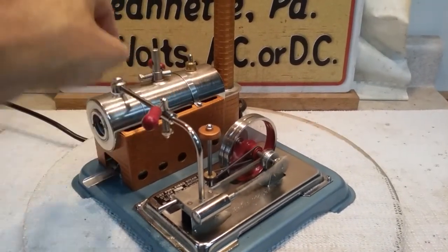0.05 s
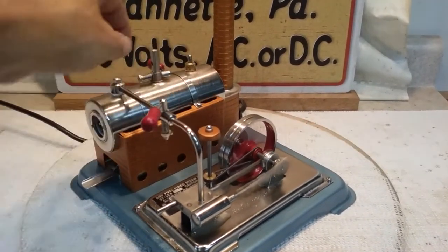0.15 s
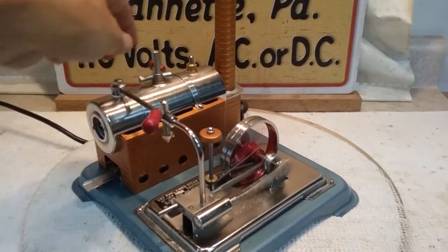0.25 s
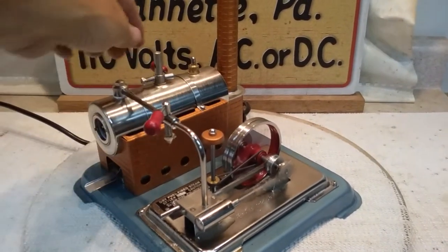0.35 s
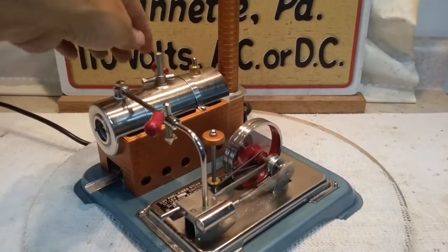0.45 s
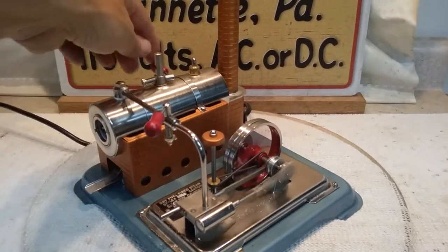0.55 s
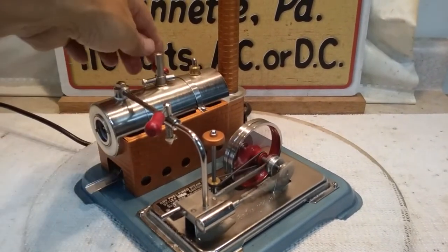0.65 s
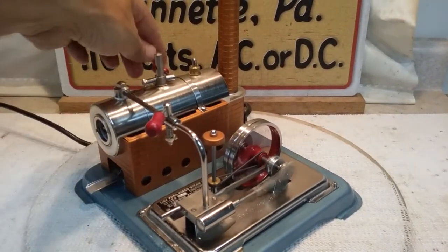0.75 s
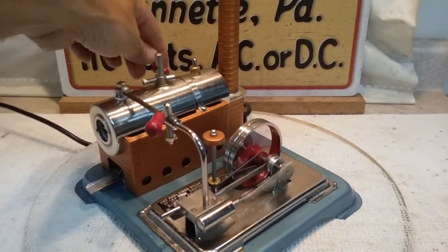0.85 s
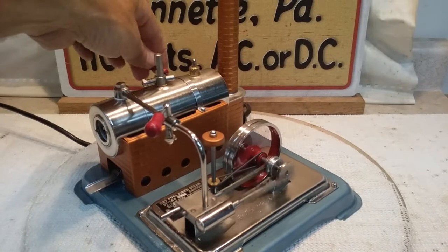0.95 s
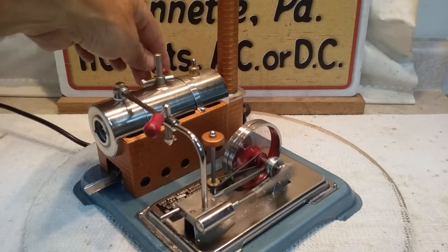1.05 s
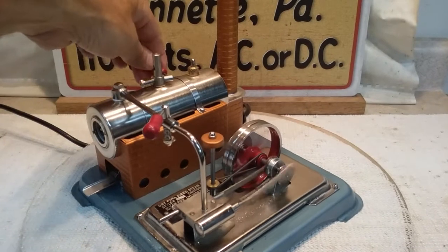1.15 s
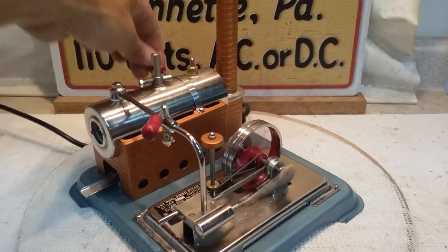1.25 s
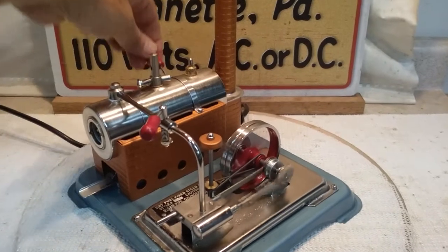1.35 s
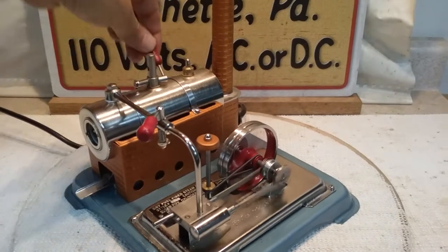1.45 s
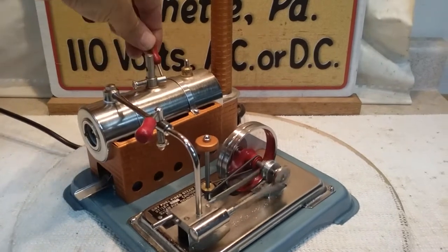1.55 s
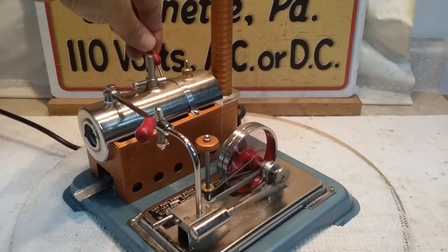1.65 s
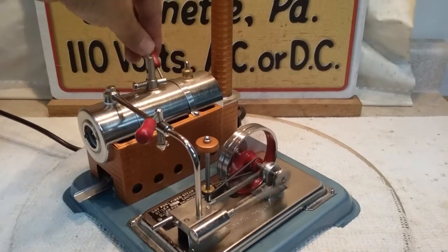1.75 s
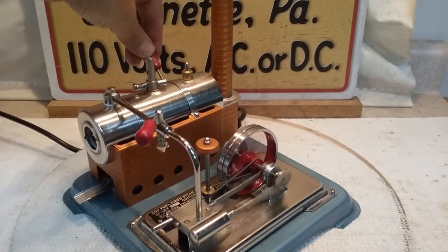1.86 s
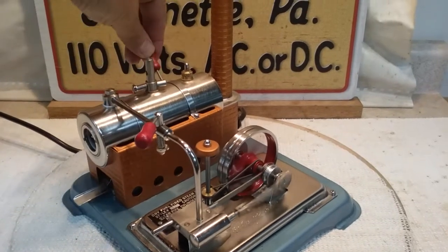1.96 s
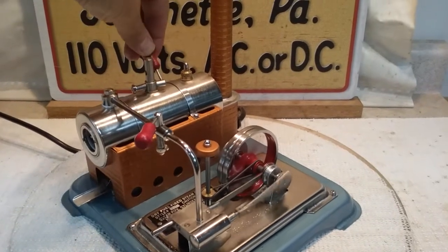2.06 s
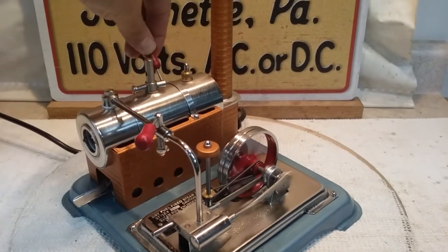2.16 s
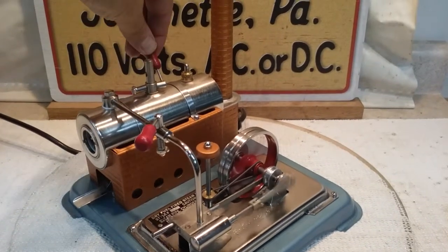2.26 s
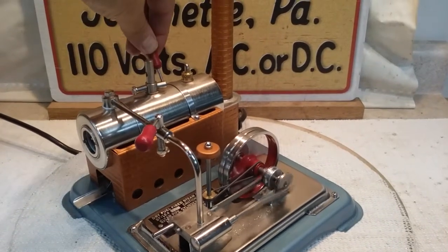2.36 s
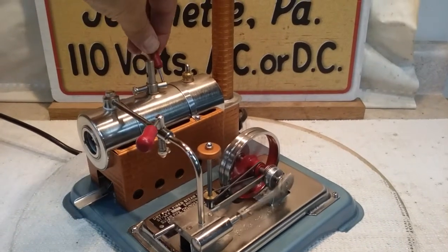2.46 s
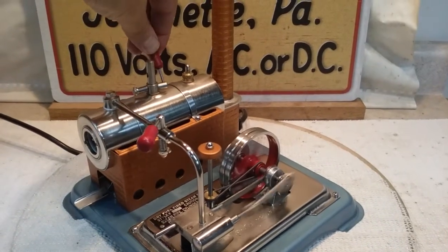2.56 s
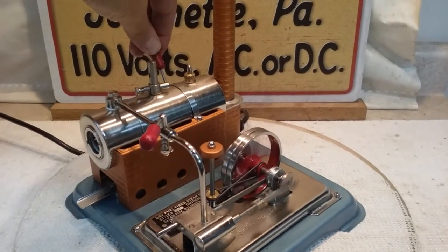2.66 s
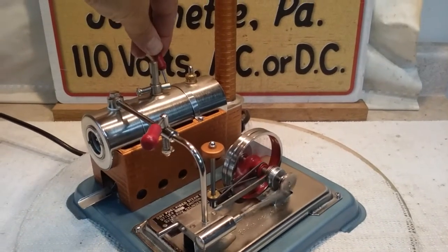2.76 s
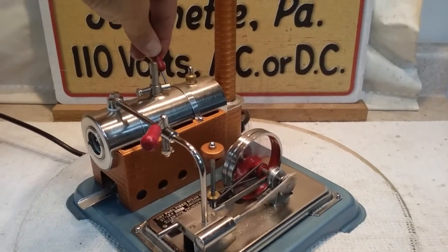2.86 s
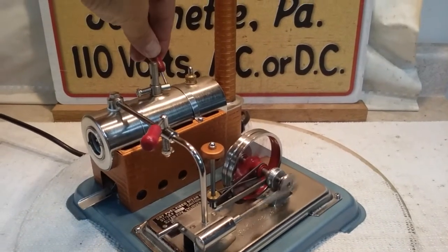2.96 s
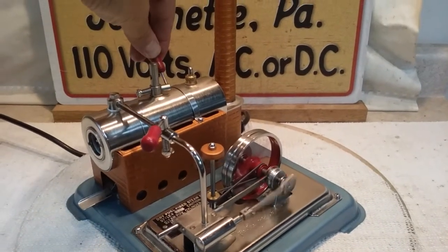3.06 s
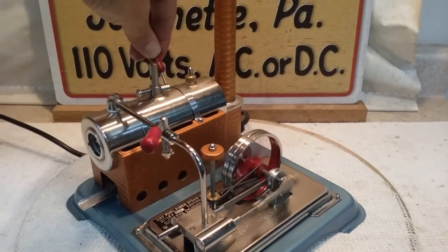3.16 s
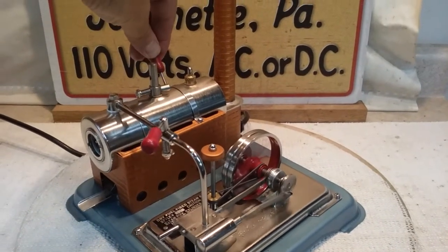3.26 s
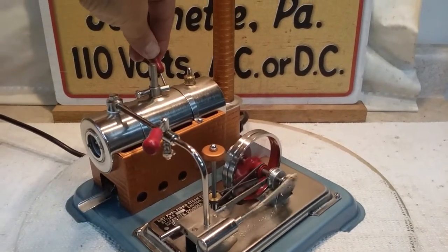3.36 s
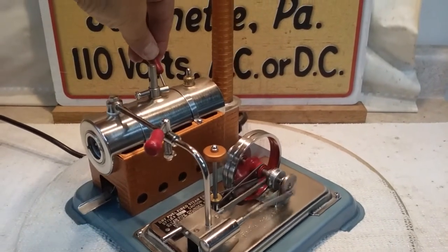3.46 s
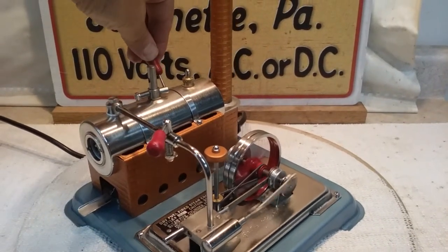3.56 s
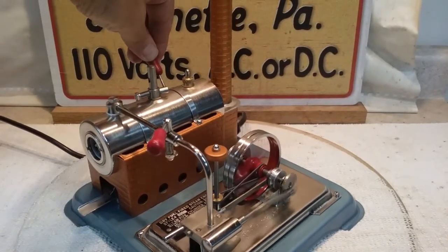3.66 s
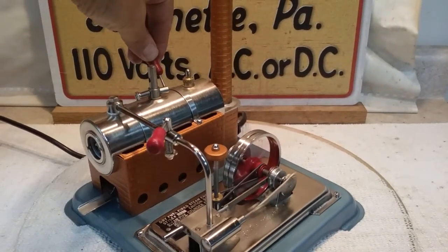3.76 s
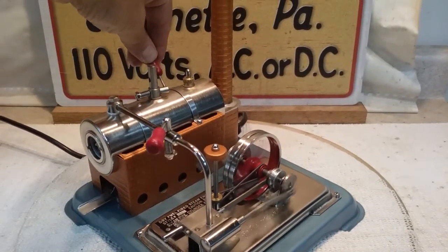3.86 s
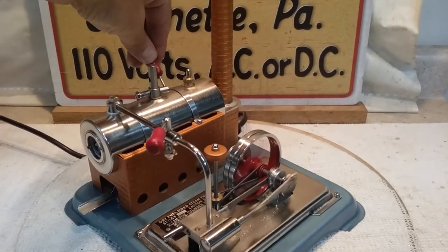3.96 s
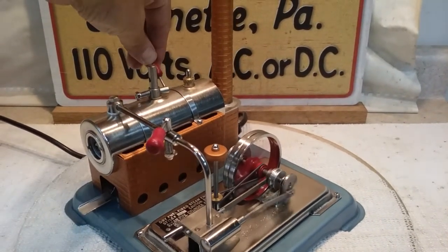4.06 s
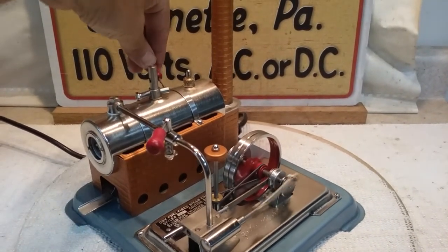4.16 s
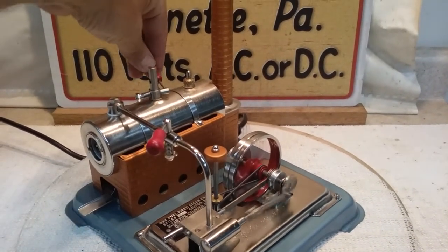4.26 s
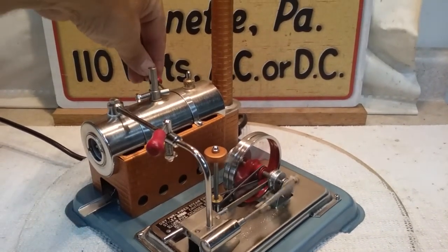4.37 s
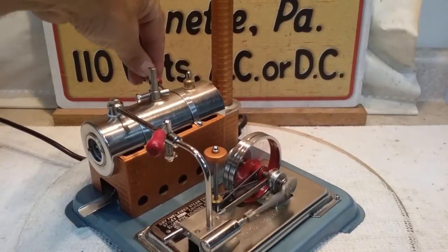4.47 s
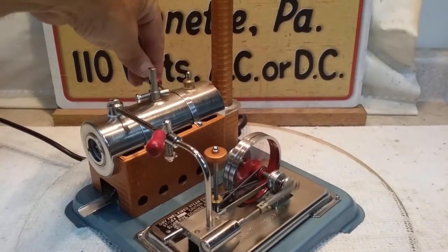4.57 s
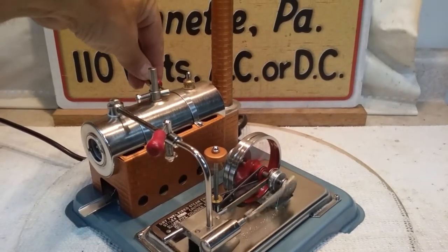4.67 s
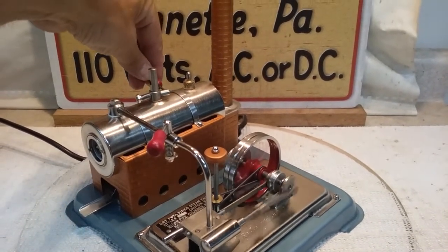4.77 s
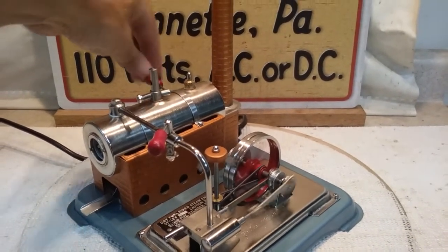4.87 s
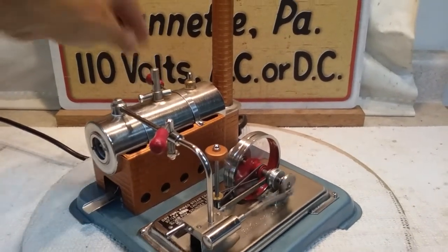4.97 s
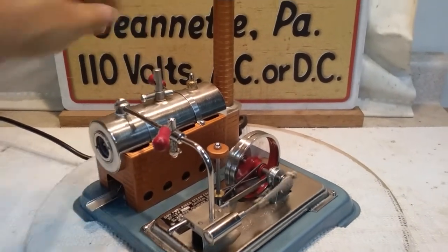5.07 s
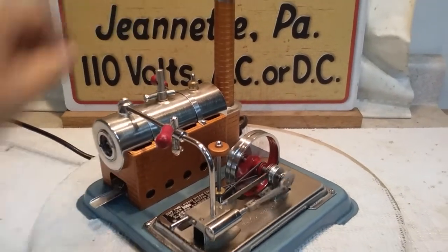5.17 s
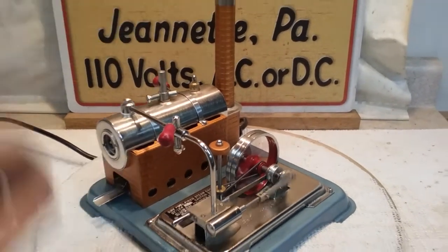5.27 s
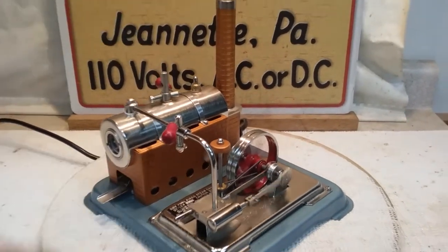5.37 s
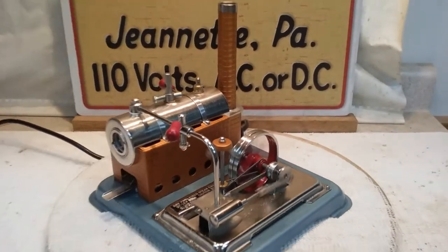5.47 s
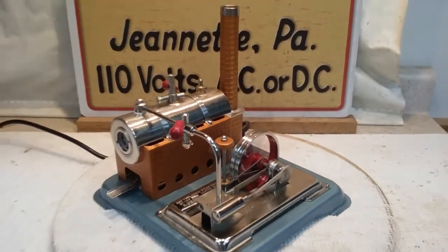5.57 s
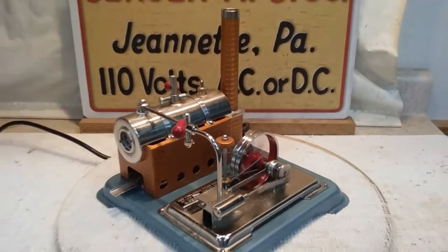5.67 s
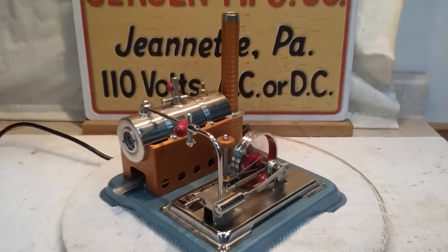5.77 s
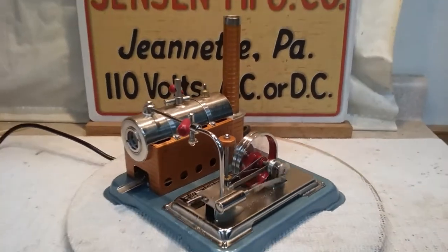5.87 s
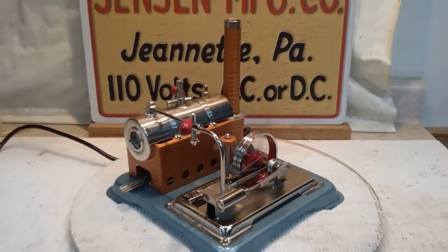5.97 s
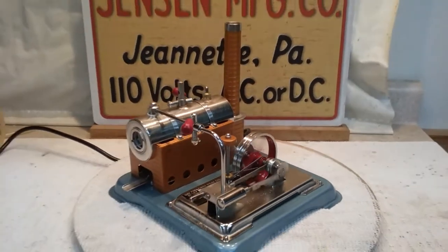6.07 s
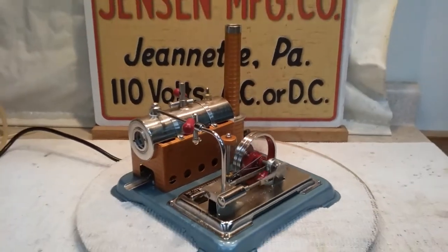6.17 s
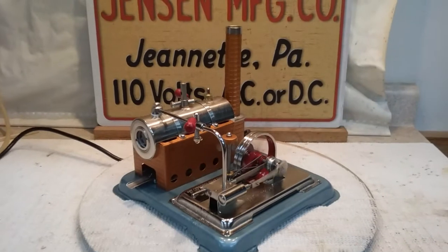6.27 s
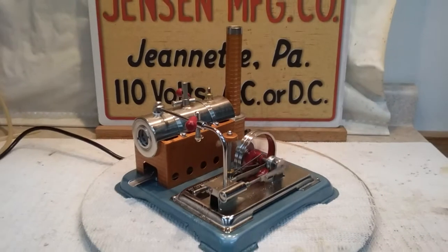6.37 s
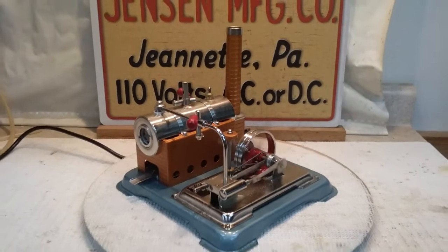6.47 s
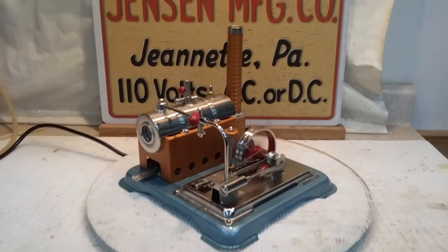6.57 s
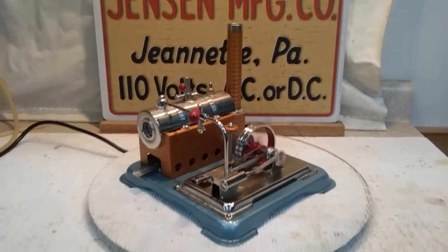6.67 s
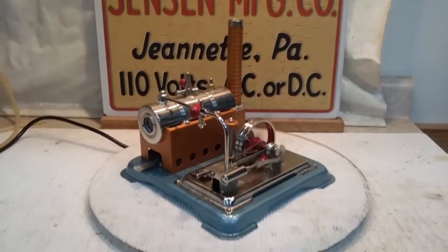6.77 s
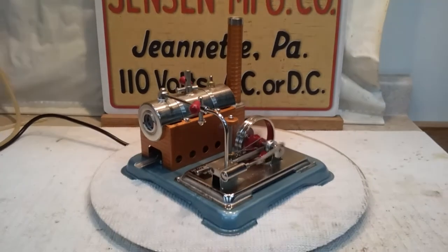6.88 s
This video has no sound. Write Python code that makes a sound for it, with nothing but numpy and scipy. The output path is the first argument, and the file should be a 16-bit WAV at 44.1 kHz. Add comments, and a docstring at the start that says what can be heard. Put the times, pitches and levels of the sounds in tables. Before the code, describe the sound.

A small steam whistle toots, then blows longer, high and hissy, over a toy steam engine slowing to a rattling crawl.

```python
"""Toy steam engine with a whistle

A toy steam engine slows to a crawl on a table in a small room. The flywheel whirrs; the crank knocks,
the exhaust plops and the slide valve ticks in time with it, while a belt pulley knocks at its own pace.
A hand opens the whistle valve twice: a short toot, then a long blow that bends up and settles, each
wrapped in the hiss of the steam jet. Once the engine is crawling, its loose rods rattle."""
import sys
import numpy as np
from scipy import signal
from scipy.fft import rfft, irfft
from scipy.io import wavfile
from scipy.ndimage import uniform_filter1d, minimum_filter1d

SR = 44100
rng = np.random.default_rng(int(sys.argv[2]) if len(sys.argv) > 2 else 0)


def dump_mix(stems):
    """Bounce the given channels to the path in sys.argv[1] as a 16-bit WAV at rate SR."""
    frames = np.atleast_2d(stems).T  # one column per channel
    limited = np.clip(frames, -1, 1)  # hard clip at full scale
    pcm = np.round(limited * 32767).astype(np.int16)
    wavfile.write(sys.argv[1], SR, pcm)


N = 305172
TIME_S = np.arange(N) / SR


def amp(db):
    """Turns decibels into a number to multiply by."""
    return 10 ** (np.asarray(db) / 20)


def evened(x):
    """Scales a signal to an average power of 1."""
    return x / np.sqrt(np.mean(x ** 2) + 1e-20)


def follow(table, at=TIME_S):
    """Reads a two-column table along straight lines between its rows."""
    return np.interp(at, *np.transpose(table))


def join_blows(blows, rest_db):
    """Makes one curve for each column after time; outside the blows the level falls to rest_db."""
    rows = []
    for blow in blows:
        first, last = blow[0], blow[-1]
        rows += [(first[0] - .01, rest_db, *first[2:]), *blow, (last[0] + .01, rest_db, *last[2:])]
    times, *columns = np.transpose(rows)
    return [np.interp(TIME_S, times, column) for column in columns]


def add(mix, start_s, sound):
    """Mixes a sound in at start_s."""
    part = mix[round(start_s * SR):][:len(sound)]
    part += sound[:len(part)]


def wander(rate_hz, n=N):
    """A smooth random wobble that changes about rate_hz times a second."""
    pole = np.exp(-2 * np.pi * rate_hz / SR)
    return evened(signal.lfilter([1], np.convolve([1, -pole], [1, -pole]), rng.standard_normal(n)))


def coloured(x, colour):
    """Turns lows and highs up or down, following rows of pitch_hz, gain_db."""
    points_hz, gain_db = np.transpose(colour)
    hz = np.fft.rfftfreq(len(x), 1 / SR)
    gain = amp(np.interp(np.log(hz + 1), np.log(points_hz + 1), gain_db))
    return irfft(rfft(x) * gain, len(x))


def noise(colour):
    """Steady noise with the given balance of lows and highs."""
    return evened(coloured(rng.standard_normal(N), colour))


def resonate(x, hz, width_hz):
    """Lets a sound ring around one pitch, which may glide; a narrow width rings longer."""
    spin = np.exp(2j * np.pi * np.cumsum(hz * np.ones(len(x))) / SR)
    pole = np.exp(-np.pi * width_hz / SR)
    return 2 * (spin * signal.lfilter([1 - pole], [1, -pole], x / spin)).real


# Tone of the quiet background: pitch_hz, gain_db
BACKGROUND_COLOUR = [(110, -38), (180, -13.5), (409, -2.5), (715, -32.5), (830, -4.5), (1320, -2.5),
                     (4280, -24.5), (5990, -13), (10300, -9), (15500, -11.5)]
# How loud the room rumbles: time_s, level_db
RUMBLE_LEVELS = [(0, -48), (1.3, -54.5), (2.1, -52.5), (2.8, -66.5), (4.2, -63.5), (4.8, -54), (6.1, -62),
                 (6.92, -59.5)]
# Tone of the rumble: pitch_hz, gain_db
RUMBLE_COLOUR = [(13, -41), (22, -18.5), (27, -16.5), (32, -23), (97, 4), (140, -2), (182, -9.5), (250, -9),
                 (320, -39), (550, -120)]
def background():
    """A faint hiss and the low rumble of the room, both gently swelling."""
    hiss = noise(BACKGROUND_COLOUR) * amp(-58 + 2 * wander(5.9))
    rumble = noise(RUMBLE_COLOUR) * amp(follow(RUMBLE_LEVELS) + 1.1 * wander(3.5))
    return hiss + rumble


# How fast the flywheel spins: time_s, turns_per_s
WHEEL_SPEED = [(0, 24.82), (.5, 16.757), (1, 13.273), (1.5, 10.884), (2.1, 8.462), (3, 6.233), (4, 4.75),
               (5, 4.258), (6.92, 4.637)]
def flywheel():
    """The wheel sets the beat: gives its speed and a running count of its turns."""
    speed = follow(WHEEL_SPEED)
    return speed, .706 + np.cumsum(speed) / SR  # starts partway through a turn


# How loud the whirr is: time_s, level_db
WHIRR_LEVELS = [(0, -31), (.4, -36), (1.2, -43.5), (2.2, -44), (3, -54), (4.2, -53), (6.92, -59)]
# Tone of the whirr: pitch_hz, gain_db
WHIRR_COLOUR = [(180, -45), (300, 4), (652, -17), (708, -11), (1300, -2), (1510, -9.5), (1910, -2.5),
                (3400, -4.5), (6790, -23), (15500, -24)]
def whirr():
    """Flywheel and bearings make a rough noise that throbs twice a turn."""
    _, turns = flywheel()
    throb_db = 1.9 * np.cos(4 * np.pi * turns) + 1.94 * wander(45)
    return noise(WHIRR_COLOUR) * amp(follow(WHIRR_LEVELS) + throb_db)


CRAWL, TROT, FULL = 4.5, 11.5, 19  # turns a second
SCATTER_DB, KNOCK_S = 1.5, .0077
def each_turn(table):
    """Lists time_s, level_db whenever the wheel passes a row's place; speed sets the level."""
    speed, turns = flywheel()
    hits = []
    for place, *levels in table:
        at = np.flatnonzero(np.diff(np.floor(turns - place)))
        level_db = np.interp(speed[at], [CRAWL, TROT, FULL], levels)
        hits += zip(at / SR, level_db + SCATTER_DB * rng.standard_normal(len(at)))
    return hits


def contacts(hits, length_s):
    """Power over time of parts touching: each touch builds, holds for a moment and lets go."""
    power = np.zeros(N)
    age = np.arange(SR // 8) / SR / length_s
    shape = (1 - np.exp(-age / .32)) * np.exp(-age ** 1.5)
    for start_s, db in hits:
        add(power, start_s, (amp(db) * shape) ** 2)
    return power


# Crank knocks within one turn: place_turns, crawl_db, trot_db, full_db
CRANK_KNOCKS = [(.01, -28, -18, -26), (.31, -35, -26, -26), (.48, -39.5, -28, -47), (.75, -31.5, -31, -19)]
def crank():
    """The power of the crank's dull knocks, four to a turn."""
    return contacts(each_turn(CRANK_KNOCKS), KNOCK_S)


# Exhaust puffs within one turn: place_turns, crawl_db, trot_db, full_db
EXHAUST_PUFFS = [(.3, -37, -54, -60), (.75, -43, -58, -64)]
def exhaust():
    """The cylinder lets out short hollow plops that ring briefly and rise a little."""
    out, t = np.zeros(N), np.arange(SR // 12) / SR
    shape = amp(-60 * t / .046) * (1 - np.exp(-t / .0025))
    for start_s, db in each_turn(EXHAUST_PUFFS):
        hz = 914 * (1 + .29 * rng.random() ** 2)
        ring = np.sin(2 * np.pi * hz * t * (1 + 1.2 * t))
        breath = evened(resonate(rng.standard_normal(len(t)), hz * 1.31, width_hz=500))
        add(out, start_s, amp(db) * shape * (ring + 1.2 * breath))
    return out


# Valve ticks within one turn: place_turns, crawl_db, trot_db, full_db
VALVE_TICKS = [(0, -46, -30, -41), (.47, -52, -37, -43)]
def slide_valve():
    """The valve gives a short, bright tick at each end of its travel."""
    out, t = np.zeros(N), np.arange(SR // 50) / SR
    shape = amp(-60 * t / .018) * (1 - np.exp(-t / .00038))
    for start_s, db in each_turn(VALVE_TICKS):
        add(out, start_s, amp(db) * shape * rng.standard_normal(len(t)))
    return coloured(out, [(2000, -4.5), (6000, 5), (9000, -3.5), (13000, 0), (16000, -2)])


# How hard the pulley knocks: time_s, level_db
PULLEY_LEVELS = [(0, -27), (.4, -13.5), (1.5, -25), (2.3, -22.5)]
def pulley(first_s=.02, first_gap_s=.034027, growth=1.022):
    """The power of the belt pulley's knocks, each gap longer than the last."""
    times = first_s + first_gap_s * (growth ** np.arange(43) - 1) / (growth - 1)
    level_db = follow(PULLEY_LEVELS, times) + SCATTER_DB * rng.standard_normal(len(times))
    return contacts(zip(times, level_db), KNOCK_S)


# Dull bumps through the table: start_s, level_db, pitch_hz
TABLE_BUMPS = [(0.29, -26, 253), (1.19, -41, 357), (2.423, -34, 235), (2.495, -36.5, 250),
               (2.701, -34, 387), (5.164, -37, 440), (5.251, -35.5, 440), (5.516, -25.5, 335),
               (5.911, -41.5, 280), (6.034, -34.5, 240), (6.358, -42, 354), (6.649, -39, 257),
               (6.803, -40.5, 500)]
def bumps(fade_s=.06):
    """Each low thud is a puff of noise ringing loosely around one pitch."""
    out, t = np.zeros(N), np.arange(SR // 5) / SR
    shape = amp(-60 * t / fade_s) * (1 - np.exp(-t / .003))
    for start_s, db, hz in TABLE_BUMPS:
        thud = evened(resonate(rng.standard_normal(len(t)), hz, width_hz=150))
        add(out, start_s, amp(db) * shape * thud)
    return out


# Steam leaving the whistle slot, one list a blow: time_s, hiss_db, edge_db, edge_hz
JET_BLOWS = [
    [(1.48, -64, -70, 5500), (1.52, -52, -41, 5940), (1.56, -39, -32.5, 6160), (1.745, -29, -32, 5900),
     (1.81, -39, -25, 5280), (1.86, -45, -25, 5570), (1.92, -65, -50, 5490)],
    [(2.09, -56, -49.5, 5800), (2.11, -47.5, -39.5, 5550), (2.15, -46, -29, 5760), (2.19, -35.5, -38, 6460),
     (2.29, -35.5, -38, 6040), (2.65, -35, -23.5, 6600), (2.84, -37, -29, 6430), (3.11, -38.5, -39.5, 5600),
     (3.87, -37.5, -35, 5550), (4.07, -40, -41, 6130), (4.14, -44.5, -33, 5440), (4.19, -46, -66, 5600),
     (4.24, -93, -91, 5360)],
]
# Tone of the hiss: pitch_hz, gain_db
JET_COLOUR = [(1000, -27), (2500, -16), (3500, -9.5), (3900, -8.5), (4350, -2), (4800, -10), (5300, 0),
              (7000, -3.5), (7400, -11.5), (7900, -1), (8500, -14.5), (10000, -9.5), (12000, -4.5),
              (15500, -5)]
def steam_jet(rest_db=-80):
    """A wide hiss from the slot, and a fuzzy band where the jet brushes the pipe's edge."""
    hiss_db, edge_db, edge_hz = join_blows(JET_BLOWS, rest_db)
    hiss = noise(JET_COLOUR)
    treble = signal.sosfiltfilt(signal.butter(2, 10500, "high", fs=SR, output="sos"), hiss)
    hiss -= treble * (1 - amp(1.3 * np.minimum(hiss_db + 35, 0)))  # a weak jet is duller
    hiss *= amp(hiss_db + 9 + 1.7 * wander(26))
    edge = evened(resonate(resonate(rng.standard_normal(N), edge_hz, 1600), edge_hz, 800))
    return hiss + edge * amp(edge_db) * (hiss_db > rest_db)


# The whistle's note, one list a blow: time_s, pitch_hz, flutter_0_to_1
WHISTLE_NOTES = [
    [(1.55, 4050, .2), (1.576, 5300, .2), (1.6, 5660, .2), (1.625, 5860, .25), (1.7, 5840, .5),
     (1.765, 5830, .4), (1.803, 5300, .25), (1.817, 4700, .25), (1.838, 3600, .25)],
    [(2.175, 4270, .15), (2.225, 5190, .15), (2.25, 5500, .15), (2.35, 5750, .3), (2.45, 6160, .55),
     (2.55, 6410, .5), (2.6, 6455, .75), (2.7, 6420, .55), (2.87, 6390, .4), (3, 5920, .45),
     (3.05, 5800, .45), (3.12, 5800, .45), (3.2, 5771, .15), (3.23, 5743, .14), (3.3, 5773, .12),
     (3.5, 5755, .1), (3.7, 5765, .2), (3.86, 5760, .12), (3.89, 5637, .2), (3.92, 5383, .3),
     (3.95, 4888, .4), (4.0, 3700, .4)],
]
# How loud the note is, one list a blow: time_s, level_db
WHISTLE_LEVELS = [
    [(1.55, -27), (1.588, -7), (1.62, -13), (1.66, -6), (1.69, -26), (1.76, -21), (1.785, -1.5),
     (1.815, -19.5), (1.838, -29)],
    [(2.175, -35), (2.225, -8), (2.33, -8), (2.55, -8), (2.66, -16.5), (2.73, -8.5), (2.86, -4),
     (2.96, -12), (3.12, -16.5), (3.15, -7.5), (3.35, -13.5), (3.58, -9), (3.7, -13.5), (3.78, -7.5),
     (3.87, -7.5), (3.93, -14), (3.975, -21.5), (4.0, -55)],
]
# The octave above grows as the jet drives the note up: pitch_hz, level_db
OCTAVE_LEVELS = [(4200, -50), (5200, -42.5), (5600, -33), (5800, -32.5), (6450, -27.5)]
# How much of the note goes into the room: pitch_hz, level_db
TO_ROOM_LEVELS = [(3600, -50), (4800, -28), (5400, -21), (5760, -26), (5850, -19), (6450, -22)]
def whistle():
    """A nearly pure note that flutters in loudness and wavers in pitch; a steadier copy for the room."""
    direct, to_room = np.zeros((2, N))
    for note, levels in zip(WHISTLE_NOTES, WHISTLE_LEVELS):
        times, *columns = np.transpose(note)
        t = np.arange(times[0], times[-1], 1 / SR)
        n = len(t)
        hz, flutter = (np.interp(t, times, column) for column in columns)
        waver_hz = 7 * wander(6, n) + 25 * flutter * wander(45, n) + 5 * wander(180, n)
        phase = 2 * np.pi * np.cumsum(hz + waver_hz) / SR
        strength = np.sqrt(1 - flutter ** 2) + flutter * wander(65, n)
        octave = amp(follow(OCTAVE_LEVELS, hz) + 2.6 * wander(30, n)) * np.sin(2 * phase)
        tone = amp(follow(levels, t)) * strength * np.sin(phase) + octave
        add(direct, times[0], np.sqrt(2) * tone * signal.windows.tukey(n, 600 / n))
        add(to_room, times[0], amp(follow(TO_ROOM_LEVELS, hz)) * np.sin(phase))
    return direct, to_room


# Wisps as the long blow starts and ends, one list each: time_s, level_db, pitch_hz
STEAM_WISPS = [
    [(2.11, -52, 5400), (2.15, -42, 6000), (2.185, -40, 6800)],
    [(3.99, -42, 6800), (4.05, -34, 6500), (4.11, -33, 6000), (4.16, -39, 5600), (4.2, -50, 5300)],
]
def wisps():
    """A faint breathy overtone while the whistle valve is barely open."""
    level_db, hz = join_blows(STEAM_WISPS, rest_db=-85.5)
    breath = evened(resonate(resonate(rng.standard_normal(N), hz, 300), hz, 300))
    return breath * amp(level_db)


# Bouts of rattling: start_s, length_s, level_db, change_per_touch_db, treble_offset_db
ROD_RATTLES = [(4.013, .09, -23, -1, -6.5), (4.315, .045, -29, -6, -3.5), (4.361, .06, -19.5, -6, -6),
               (4.442, .03, -28, -1, -1), (4.506, .05, -30.5, 4.5, -0.5), (4.625, .09, -27, 0.5, -2),
               (4.758, .01, -30, 0, -8), (4.788, .03, -27, 0, -2.5), (4.836, .09, -19.5, -2.5, -3),
               (4.984, .03, -24, -2, -2), (5.09, .01, -28.5, 0, -5), (5.195, .03, -39, -5.5, -14),
               (5.256, .07, -28, 0, -6.5), (5.356, .05, -23, 0, -7.5), (5.447, .04, -24, -4, -10),
               (5.616, .04, -34, 1, -7.5), (5.671, .01, -26.5, 0, -3), (5.908, .09, -35, 1, -3.5),
               (6.018, .05, -30.5, -2.5, -7), (6.139, .01, -29.5, 0, -8.5), (6.175, .02, -30.5, -12, -3.5),
               (6.319, .035, -29.5, 2, -4.5), (6.413, .01, -35, 2, -9), (6.516, .16, -36, 1, -7.5),
               (6.697, .04, -29.5, 3.5, -3), (6.771, .01, -30, 0, -8), (6.801, .04, -24.5, -5.5, -9.5),
               (6.86, .05, -51.5, 7, -3.5)]
def loose_rods(gap_s=.021, touch_s=.015, scatter_db=.5):
    """Rods touch in quick, uneven runs; gives the power of the dull part and of the bright part."""
    dull, bright = [], []
    for start_s, length_s, db, change_db, treble_db in ROD_RATTLES:
        gaps = gap_s * np.exp(.23 * rng.standard_normal(12))
        delays = np.cumsum(gaps) - gaps[0]
        for count, at in enumerate(start_s + delays[delays < length_s]):
            touch_db = db + count * change_db
            dull.append((at, rng.normal(touch_db, scatter_db)))
            bright.append((at, rng.normal(touch_db + treble_db, scatter_db)))
    return contacts(dull, touch_s), contacts(bright, touch_s)


def ring_metal(x, rings, dry_db, dry_above_hz, flicker_db):
    """Metal rings at its own pitches, each more or less by chance; some plain sound gets through."""
    out = amp(dry_db) * signal.sosfilt(signal.butter(2, dry_above_hz, "high", fs=SR, output="sos"), x)
    for hz, base_width_hz, db in rings:
        width_hz = base_width_hz + hz / 200 + 20  # the mounting damps the ring
        out += resonate(x * amp(db + flicker_db * wander(25)), hz, width_hz)
    return out


# How the base plate and boiler ring: pitch_hz, base_width_hz, gain_db
FRAME_RINGS = [(737.4, 26, -1.5), (958, 10, -10), (1327, 16, -6), (1897, 190, -10.5), (2720, 41, -25.5),
               (3504, 110, -9), (4350, 700, -15), (5350, 230, -13.5), (6300, 45, -7.5), (6880, 82, -15.5)]
# How the thin rods ring: pitch_hz, base_width_hz, gain_db
ROD_RINGS = [(8255, 33, -0.5), (8670, 89, -21), (10130, 118, 1), (10460, 330, -5.5), (10950, 99, -2),
             (14100, 1450, -12)]
def engine_body():
    """Whirr, knocks and rattles shake the frame; the bright part of the rattles rings the rods."""
    dull_power, bright_power = loose_rods()
    grit = rng.standard_normal(N) * amp(3 * wander(250))  # loose parts chatter
    scuffs = grit * np.sqrt(crank() + pulley() + dull_power)
    scuffs = coloured(scuffs, [(500, -24.5), (900, -2), (4600, -2), (6500, -20.5), (16000, -23.5)])
    spits = rng.standard_normal(N) * amp(4 * wander(400))  # the rods take it as separate spits
    spits *= np.sqrt(abs(uniform_filter1d(bright_power, size=60)))
    shaking = amp(8) * whirr() + amp(4) * scuffs
    frame = ring_metal(shaking, FRAME_RINGS, dry_db=-11, dry_above_hz=440, flicker_db=3.4)
    rods = ring_metal(spits, ROD_RINGS, dry_db=-36, dry_above_hz=6100, flicker_db=1.5)
    return frame + amp(5.5) * rods


def room(x, fade_s=.29):
    """Many small, quickly fading echoes; walls and air soak up the treble."""
    echoes = np.zeros(SR // 2)
    at = np.arange(400, len(echoes) - 20, 20)
    at += rng.integers(0, 20, len(at))
    echoes[at] = rng.choice([-1., 1.], len(at)) * amp(-60 * at / SR / fade_s)
    echoed = signal.fftconvolve(x, echoes / np.linalg.norm(echoes))[:N]
    return coloured(echoed, [(100, 11.5), (6500, 5), (9000, -2.5), (16000, -11)])


def scene():
    """Engine and whistle with their echoes, over the bumps and the background."""
    tone, tone_to_room = whistle()
    hiss = steam_jet() + wisps()
    engine = engine_body() + slide_valve() + exhaust()
    steam = tone + hiss + room(tone_to_room + amp(-14.5) * hiss)
    return (steam + engine + amp(-17) * room(engine) + bumps() + background())[None]


def loudness_db(x, samples):
    """The level of a sound, averaged over a sliding stretch of samples."""
    return 10 * np.log10(abs(uniform_filter1d(x ** 2, samples)) + 1e-12)


def record(dry):
    """Thins the low mids when loud, hushes quiet moments, rounds off peaks, trims bass and top treble."""
    cut_db = .49 * uniform_filter1d(np.maximum(loudness_db(dry[0], 8000) + 17.5, 0), 8000)
    low_mids = signal.sosfiltfilt(signal.butter(2, [170, 1300], "band", fs=SR, output="sos"), dry)
    thinned = dry - low_mids * (1 - amp(-cut_db))
    hushed = thinned * amp(.6 * np.clip(loudness_db(dry[0], 900) + 47.5, -12, 0))
    peak = uniform_filter1d(-minimum_filter1d(-abs(hushed), size=101), size=101)
    rounded = hushed / (1 + (peak / .9) ** 6) ** (1 / 6)
    bass_cut = signal.butter(2, 45, "high", fs=SR, output="sos")  # small microphone
    treble_cut = signal.firwin(511, 15750, window=("kaiser", 9), fs=SR)
    return signal.oaconvolve(signal.sosfilt(bass_cut, rounded), treble_cut[None], "same")


dry = scene()
out = record(dry)
dump_mix(out)
```